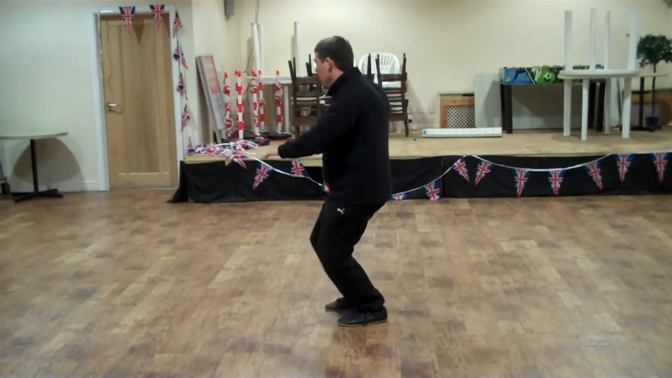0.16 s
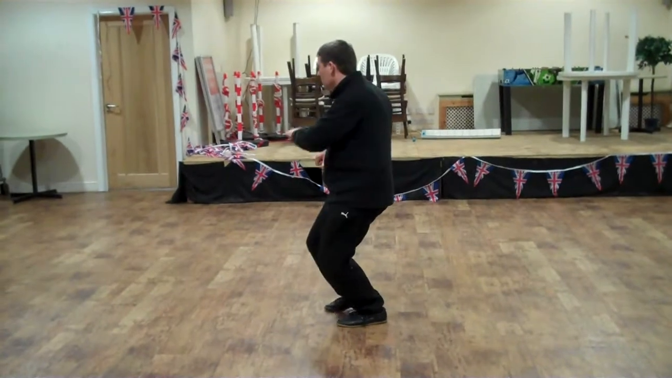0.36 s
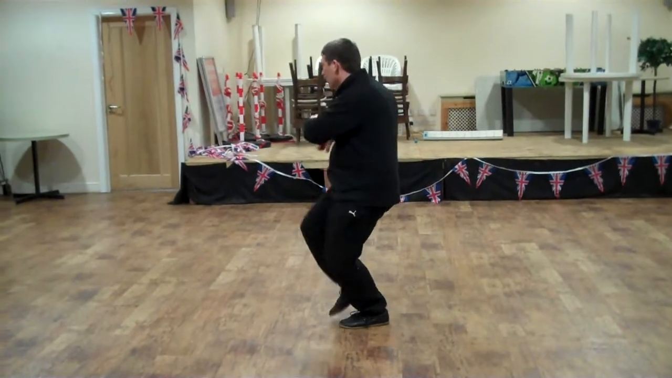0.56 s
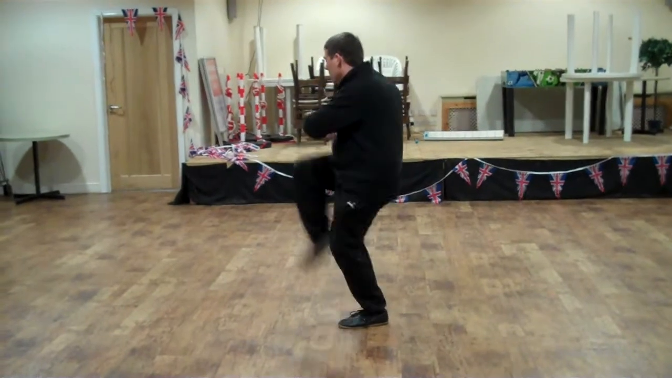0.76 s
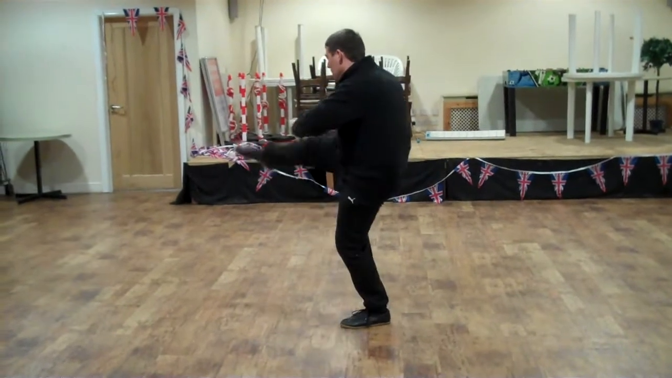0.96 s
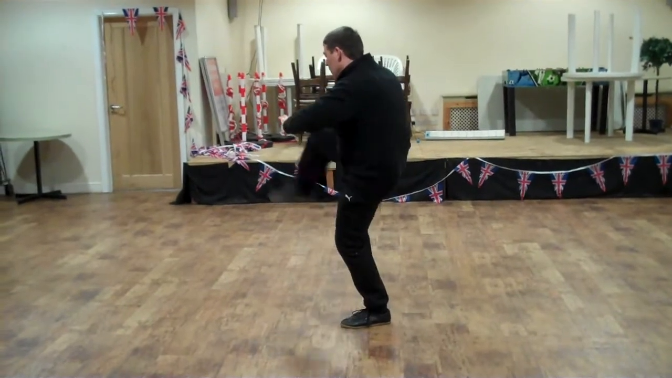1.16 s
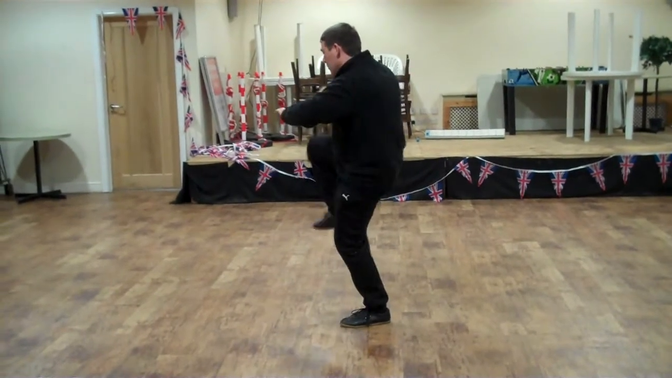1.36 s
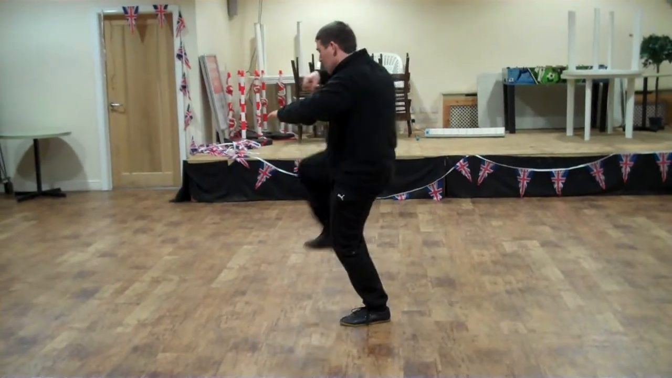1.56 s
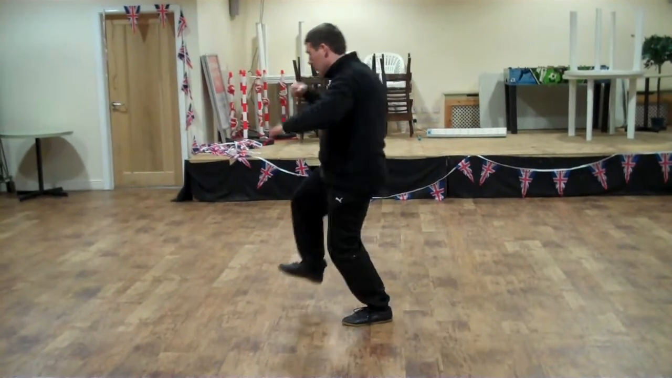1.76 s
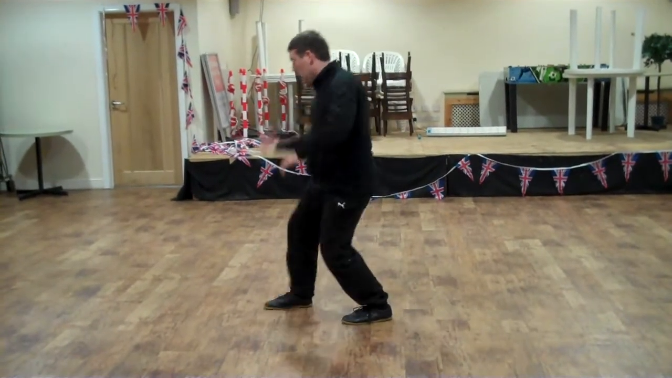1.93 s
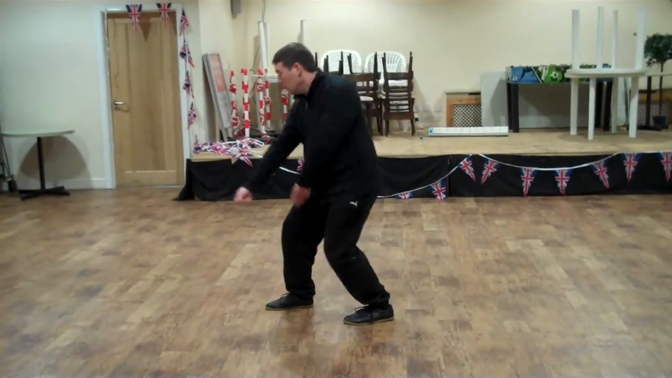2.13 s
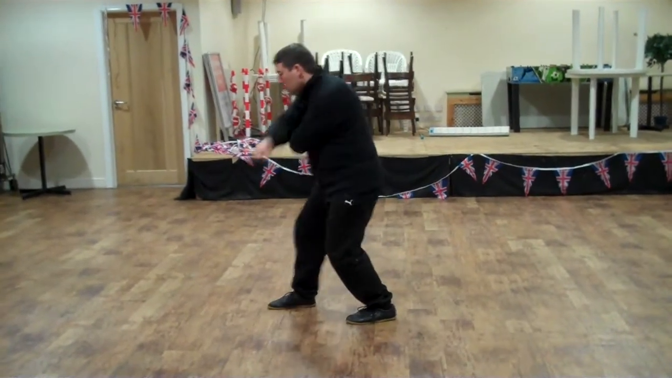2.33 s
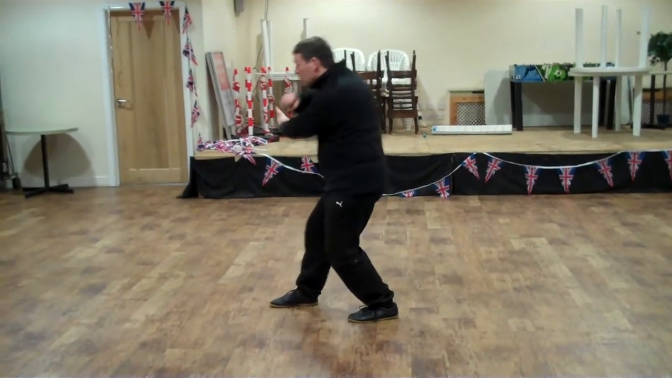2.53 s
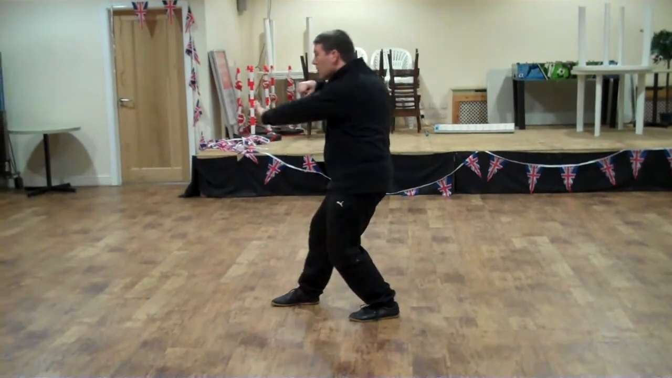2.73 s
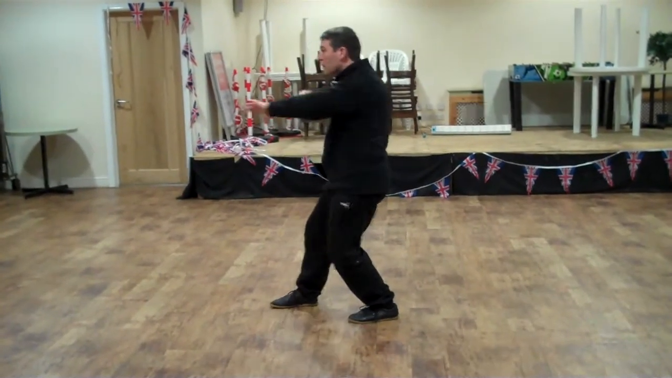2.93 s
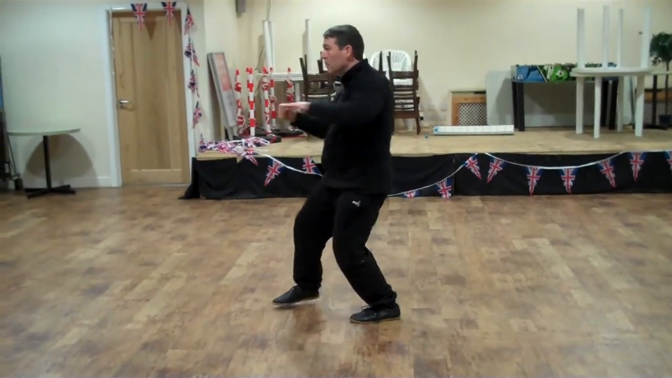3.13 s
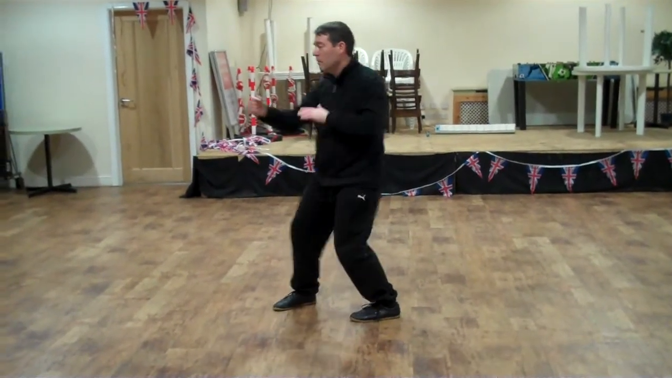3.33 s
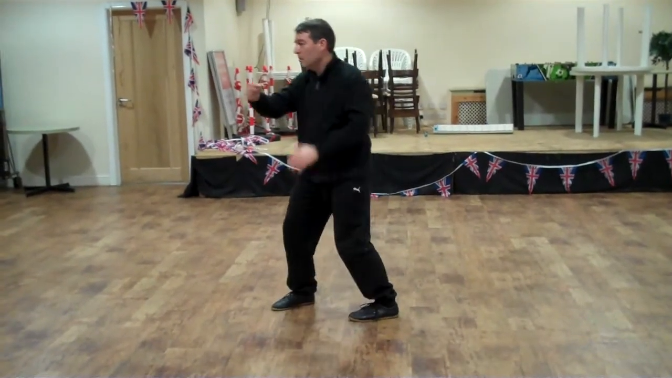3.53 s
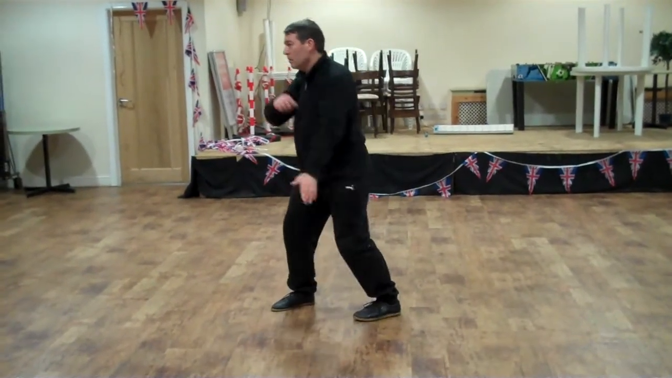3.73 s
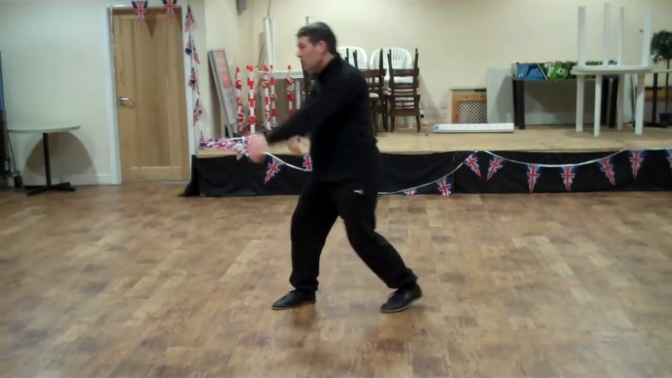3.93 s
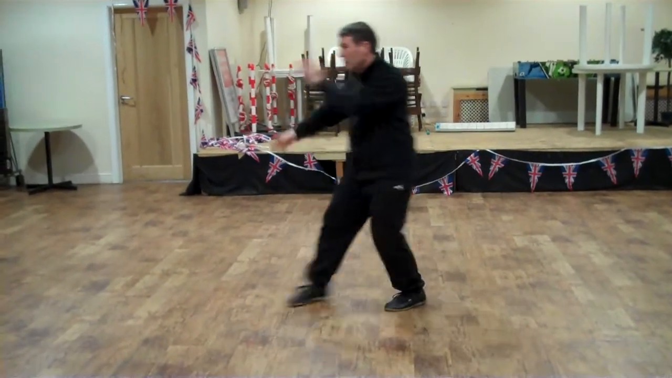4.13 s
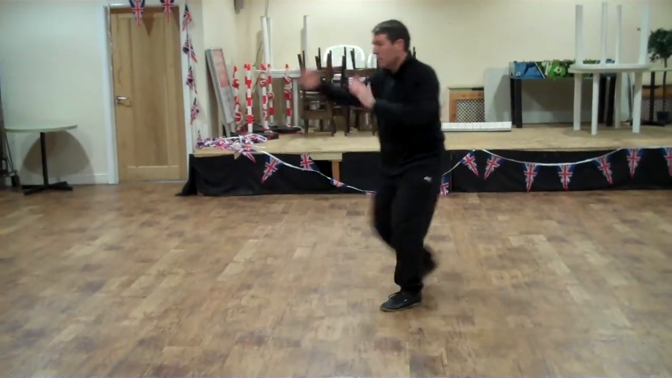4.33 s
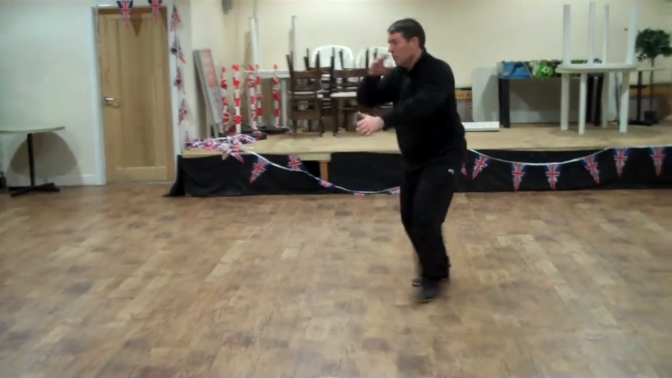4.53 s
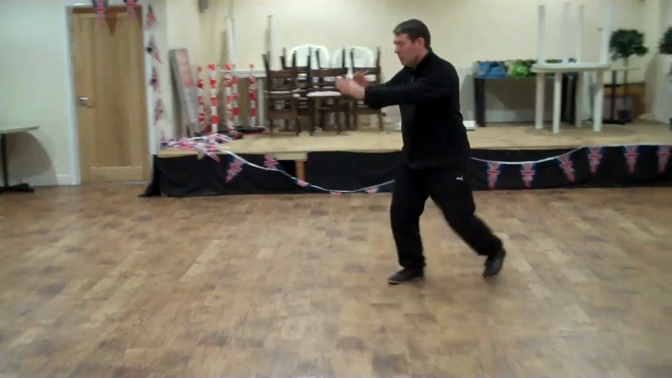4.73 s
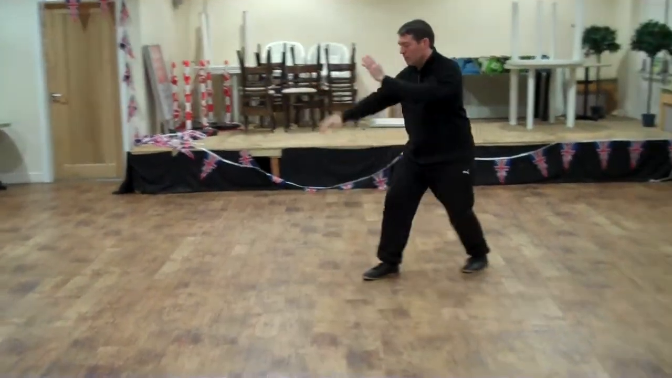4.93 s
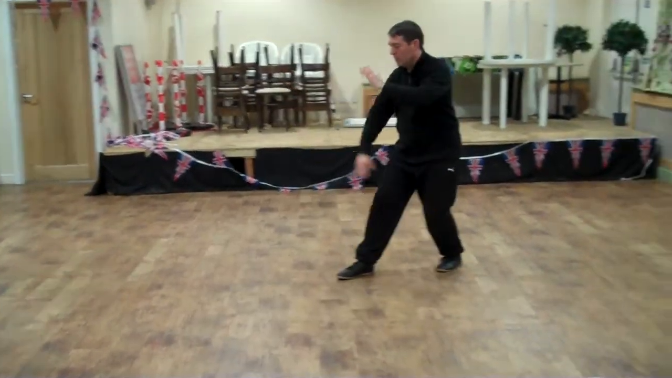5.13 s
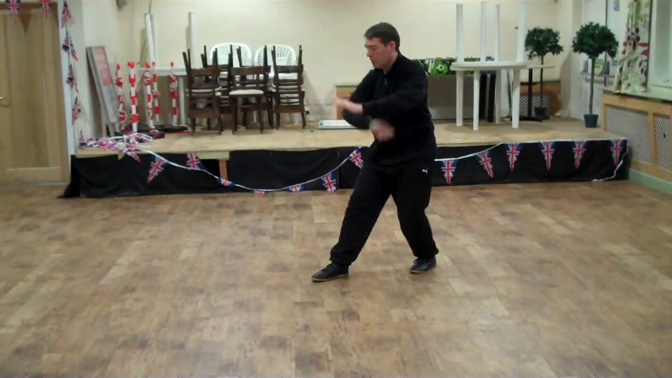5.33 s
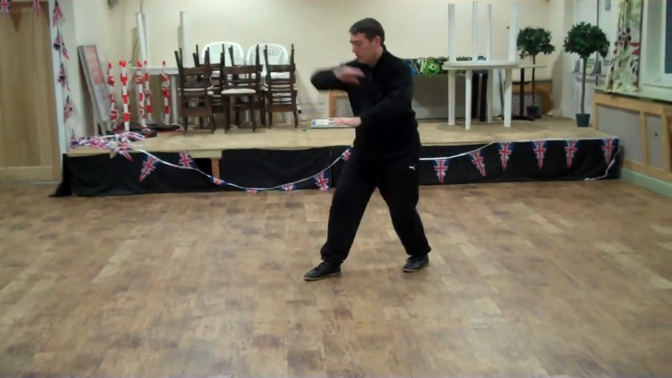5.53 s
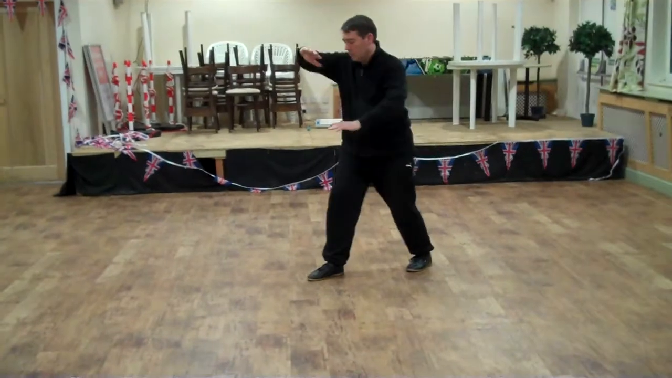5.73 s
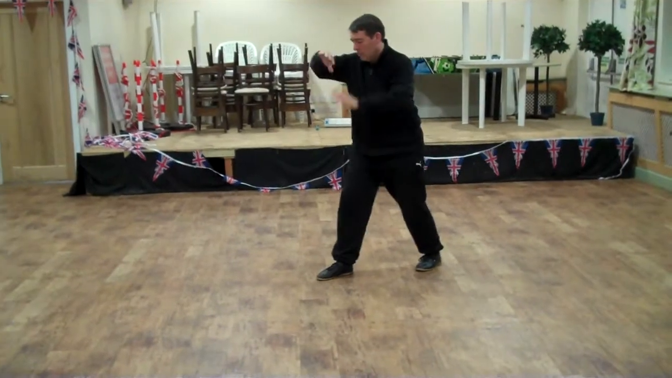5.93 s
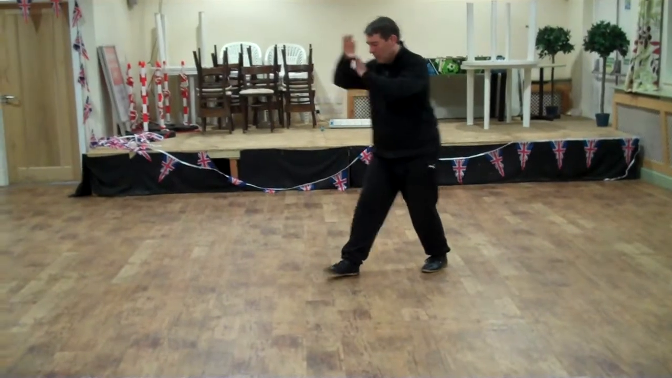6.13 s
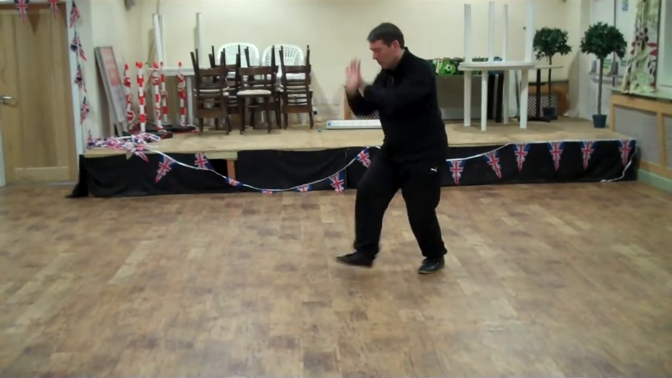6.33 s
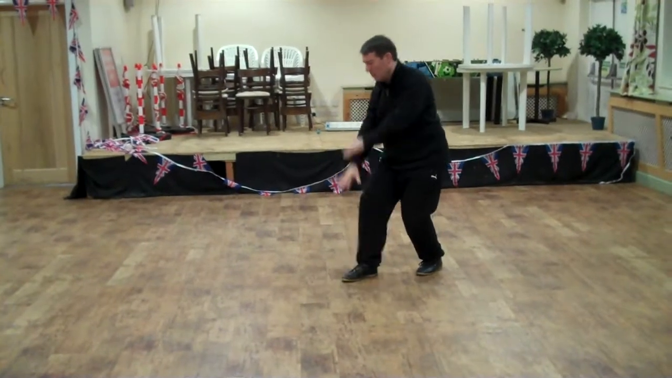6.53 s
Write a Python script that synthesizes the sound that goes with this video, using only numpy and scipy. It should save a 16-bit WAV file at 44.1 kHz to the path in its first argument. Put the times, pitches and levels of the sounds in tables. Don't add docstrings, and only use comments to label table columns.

```python
import sys
import numpy as np
from scipy import signal
from scipy.io import wavfile

SR = 44100
rng = np.random.default_rng(int(sys.argv[2]) if len(sys.argv) > 2 else 0)


def convert_level_to_amplitude(level_db):
    exponent = np.asarray(level_db, float) / 20
    return 10 ** exponent


def unload_audio(sound):
    columns = np.transpose(np.atleast_2d(sound))
    steps = np.round(np.clip(columns, -1, 1) * 32767)
    wavfile.write(sys.argv[1], SR, steps.astype(np.int16))


N = 290178


def rms_one(x):
    return x / np.sqrt(np.mean(x ** 2) + 1e-20)


def at_hz(points, hz):
    table_hz, values = np.transpose(points)
    return np.interp(np.log(hz), np.log(table_hz), values)


def gain_curve(tables):
    t = np.arange(N) / SR
    return sum(convert_level_to_amplitude(np.interp(t, *np.transpose(rows)[:2], left=-200, right=-200)) for rows in tables)


def swells(rows):
    t = np.arange(0, N + 32, 32) / SR
    power = 0
    for start, hold, db, rise, fall in rows:
        before = (start - t) / abs(rise)
        after = np.maximum(t - start - hold, 0) / abs(fall)
        power = power + convert_level_to_amplitude(db - 20 * np.maximum(before, after)) ** 2
    return np.interp(np.arange(N) / SR, t, np.sqrt(power))


def drift(rate, size):
    knots = rng.standard_normal(400)
    return np.interp(np.arange(size) / SR * rate, np.arange(400), knots)


def resonate(x, hz, width_hz):
    r = np.exp(-np.pi * width_hz / SR)
    gain = (1 - r * r) / 2
    return signal.lfilter([gain, 0, -gain], [1, -2 * r * np.cos(2 * np.pi * hz / SR), r * r], x)


def grains(per_s, spread_db):
    sizes = convert_level_to_amplitude(spread_db * np.minimum(rng.exponential(1, N), 4)) * rng.choice([-1, 1], N)
    return rms_one(sizes * (rng.random(N) < per_s / SR))


def diffuse(colour, size, shape):
    # (frequency [Hz], left-right correlation)
    likeness = [(30, .3), (60, .9), (130, .97), (290, .98), (700, .98), (1000, .9), (1400, .6), (2300, .12),
                (3090, 0), (15000, 0)]
    # (frequency [Hz], left-right difference [dB])
    left_excess = [(60, 1), (290, 1.8), (700, .5), (1290, 2.3), (2380, 5), (4390, 4.3), (8100, 6.5),
                   (15000, 6.5)]
    edges_hz = 25 * 2 ** np.arange(0, 9.4, 1 / 3)
    white = rng.standard_normal((2, 2, size + 4000))
    out = 0
    for k, (low, high) in enumerate(zip(edges_hz, edges_hz[1:])):
        if high < colour[0][0] / 2:
            continue
        band = signal.butter(2, [low, high], "band", fs=SR, output="sos")
        mid, side = signal.sosfilt(band, white[k % 2])[:, -size:]
        hz = np.sqrt(low * high)
        alike = np.clip(at_hz(likeness, hz), -1, 1)
        pair = np.sqrt(1 + alike) * mid + np.sqrt(1 - alike) * side * [[1], [-1]]
        level_db = at_hz(colour, hz) + at_hz(left_excess, hz) * np.array([[.5], [-.5]])
        out = out + convert_level_to_amplitude(level_db) * pair * shape(hz)
    return out


def hall(colour, start_s=0):
    # (frequency [Hz], time to fall 60 dB [s])
    t60 = [(60, 1.0), (170, 1.65), (340, 1.43), (650, 1.85), (1000, 1.797), (2000, 1.578), (4000, 1.222),
           (6000, 0.969), (8000, 0.649), (12000, 0.246)]
    # (frequency [Hz], time [s])
    fill = [(60, 0.0055), (200, 0.0049), (700, 0.00306), (3000, 0.00186), (9000, 0.0056)]
    t = np.arange(min(int(2.4 * SR), N - int(start_s * SR))) / SR

    def envelope(hz):
        thickening = 1 - np.exp(-t / abs(at_hz(fill, hz)))
        return thickening * convert_level_to_amplitude(-60 * t / at_hz(t60, hz))

    tail = diffuse(colour, len(t), envelope)
    return tail / np.sqrt(np.mean(tail[:, :SR // 10] ** 2))


def ventilation():
    # (frequency [Hz], level [dB per Hz])
    air_colour = [(15, -50), (28, -24.5), (45, -14), (75, -15.5), (110, -11), (190, -11), (230, -6.5),
                  (450, -5), (520, -5), (700, -6), (1000, -7.5), (1430, -15), (2500, -17), (5900, -27),
                  (7300, -27), (14500, -57)]
    # (frequency [Hz], width [Hz], level [dB])
    duct_tones = [(662.4, 23.7, -59.5), (429.2, 46, -65), (760.6, 26.3, -66.5), (139.98, 6.6, -66)]
    # (start [s], end [s], frequency [Hz], width [Hz], level [dB])
    whistles = [
        (5.15, 6.45, 2464, 11, -71.5),
        (5.698, 6.099, 1350, 38, -67),
        (5.7, 6.3, 4843, 82, -77),
    ]
    hum_hz, hum_db = 100.5, -60
    air = convert_level_to_amplitude(-51) * rms_one(diffuse(air_colour, N, lambda hz: convert_level_to_amplitude(0.346 * drift(3.206, N))))

    def tone(hz, width):
        once = resonate(rng.standard_normal(N), hz, width)
        return rms_one(resonate(once, hz, width))

    tones = sum(convert_level_to_amplitude(db) * tone(hz, width) for hz, width, db in duct_tones)
    for start, end, hz, width, db in whistles:
        passing = [(start, db - 3), (start + 0.066, db), (end - .1, db), (end, db + 0.5)]
        tones += tone(hz, width) * gain_curve([passing])
    hum = convert_level_to_amplitude(hum_db + 0.71 * drift(3.81, N)) * np.sin(2 * np.pi * hum_hz * np.arange(N) / SR)
    return air + (tones + hum) * convert_level_to_amplitude([[.6], [-.6]])


def swish():
    # (frequency [Hz], level [dB per Hz])
    hiss_colour = [(3000, -19), (4500, -9.5), (6000, -12), (7400, -2), (9000, -11), (11000, -16.5),
                   (14500, -31)]
    body_colour = [(600, -6.5), (1300, -1.5), (2500, 1), (4000, -3.5), (5500, -10), (8000, -26.5)]
    sizzle_colour = [(7000, -30), (9500, -12), (11500, -3.5), (14500, 3)]
    # (full level from [s], hold [s], level [dB], 20 dB rise [s], 20 dB fall [s])
    strokes = [(0.15, 0.16, -67.5, 1.18, 0.47), (0.458, 0.01, -62.5, 0.16, -0.05),
               (0.773, 0.028, -57.5, 0.65, 0.5), (1.0, 0.076, -64.5, 0.46, 0.67),
               (1.469, 0.3, -65.5, 0.17, 0.63), (2.929, 0.082, -65, 0.43, 0.64),
               (3.695, 0.09, -50.5, 0.1604, -0.03), (3.806, 0.0044, -46.5, 0.04, 0.01),
               (3.858, 0.082, -45, 0.0371, 0.2143), (4.128, 0.0335, -34.5, 0.0472, 0.103),
               (4.23, 0.0204, -50, 0.12, 0.24), (4.302, 0.034, -47, 0.0753, 0.1058),
               (4.373, 0.0335, -41, 0.15, 0.1817), (4.61, 0.019, -50.5, 0.07, 0.19),
               (4.737, 0.0088, -45.5, 0.07, 0.2), (4.883, 0.057, -58, 0.62, 0.56),
               (5.58, 0.03, -68, -0.52, 0.8), (5.931, 0.288, -64.5, 0.27, 0.31)]
    # (full level from [s], hold [s], level [dB], 20 dB rise [s], 20 dB fall [s])
    snaps = [
        (3.698, 0.0146, -49.5, 0.07, 0.19),
        (3.9, 0.146, -60.5, 0.19, 0.2),
        (4.155, 0.0116, -39, 0.1114, 0.1937),
        (4.26, 0.136, -47, 0.11, 0.6),
        (4.7, 0.025, -63, 0.0986, 0.166),
        (4.8, 0.166, -70.5, 0.083, 0.481),
    ]
    # (time [s], level [dB])
    creaks = [
        (0.4605, -49),
        (1.274, -41.5),
        (3.6644, -49.5),
        (3.79, -50),
        (4.6109, -43.5),
        (5.5994, -59.5),
    ]
    hiss = rms_one(diffuse(hiss_colour, N, lambda hz: 1))
    body = rms_one(diffuse(body_colour, N, lambda hz: 1))

    sizzle_db, from_db, slope, fade = -11.5, -40, 0.67, 0.4
    firm = [(s, hold, db + sizzle_db + (slope - 1) * (db - from_db), rise, fade * fall)
            for s, hold, db, rise, fall in strokes if db > -57]
    sizzle = rms_one(diffuse(sizzle_colour, N, lambda hz: 1)) * swells(firm)

    ticks = np.zeros(N)
    ticks[[round(s * SR) for s, db in creaks]] = convert_level_to_amplitude(np.array(creaks)[:, 1] - 7.5)
    puffs = signal.lfilter([1], [1, -np.exp(-1 / (0.0048 * SR))], ticks)
    bright = swells(strokes) * convert_level_to_amplitude(2.0 + 1.1 * drift(40, N))
    return sizzle + hiss * (bright + convert_level_to_amplitude(-5.0) * puffs) + body * (swells(snaps) + puffs)


def soles():
    # (time [s], level [dB], rub centre [Hz], width [octaves])
    slides = [
        [(4.26, -40, 476, 0.16), (4.275, -34, 452, 0.13), (4.29, -44, 750, 0.25), (4.32, -31.5, 967, 0.232),
         (4.4, -36, 892, 0.4), (4.49, -41, 970, 0.15), (4.63, -43, 980, 0.12), (4.66, -51.5, 980, .2)],
        [(4.68, -51.5, 1390, 0.106), (4.69, -34.5, 1370, 0.092), (4.73, -31.5, 939, 0.208),
         (4.77, -37, 879, 0.254), (4.86, -41, 799, 0.56), (4.98, -48.5, 1200, 0.245), (5.1, -67, 910, 0.29)],
    ]
    # (full level from [s], hold [s], level [dB], 20 dB rise [s], 20 dB fall [s])
    shifts = [
        (1.18, 0.056, -51.5, 0.03117, 0.69),
        (3.6, 0.0038, -43, 0.0097, 0.035),
        (3.99, 0.0049, -51.5, 0.041, 0.07),
    ]
    # (full level from [s], hold [s], level [dB], 20 dB rise [s], 20 dB fall [s])
    flexes = [
        (4.14, 0.02, -72, 0.2043, 0.21),
        (4.44, 0.1, -64, 0.65, 1.042),
        (5.03, 0.05, -70.5, 0.62, 0.3),
    ]
    slips = grains(per_s=5000, spread_db=3.0)
    s, _, centre_hz, octaves = np.transpose(slides[0] + slides[1])
    t = np.arange(N) / SR
    centre = np.interp(t, s, centre_hz)
    wide = np.interp(t, s, octaves)
    rub = np.zeros(N)
    for hz in np.geomspace(420, 2000, num=20):
        opening = convert_level_to_amplitude(-40.5) + np.exp(-(np.log2(centre / hz) / wide) ** 2)
        rub += resonate(slips, hz, 0.0427 * hz) * opening * np.sqrt(.3 / wide)
    shuffle = resonate(grains(per_s=2500, spread_db=5.5), 1120, 970)
    flex = resonate(rng.standard_normal(N), 52, 35)
    return rms_one(rub) * gain_curve(slides) + rms_one(shuffle) * swells(shifts) + rms_one(flex) * swells(flexes)


def slaps():
    arrival_s = [1.8954, 1.8997, 1.9016, 1.9062, 1.9082, 1.9127, 1.9195, 1.9525, 3.2582, 3.2612, 3.2628,
                 3.2660, 3.2696, 3.2728, 6.4744, 6.4764, 6.4780, 6.4788, 6.4824, 6.4853, 6.4878, 6.4890,
                 6.4910, 6.5046]
    # (crack [dB], snap [dB], clap [dB], clap frequency [Hz])
    arrivals = [
        [(-11, -12, -18.5, 3460), (-12, -23, -10, 2420), (-29, -5, -3.5, 1895), (-10.5, -31, -9, 2680),
         (-7, -9.5, -11, 2060), (-6, -14, -20.5, 2440), (-7.5, -24, -29.5, 2357), (-15.5, -16, -26.5, 2960)],
        [(-8.5, -13.5, -12.5, 2760), (-19, -11, -10, 1930), (-18, -14, -15, 2380), (-18, -23.5, -20.5, 2250),
         (-23, -28, -17, 2250), (-24.5, -27, -21, 2470)],
        [(-3, -10.5, -7, 2650), (-11.5, -25.5, -9, 2570), (-33, -12.5, -3, 3090), (-5.5, -22.5, -5, 1674),
         (-18.5, -26.5, -6, 1770), (-10, -25, -10.5, 1950), (-16.5, -29.5, -9.5, 2480),
         (-21.5, -19.5, -11, 2050), (-22, -27.5, -10, 1600), (-29, -27.5, -13.5, 1640)],
    ]
    # (board level [dB], loss per echo [dB], left-right difference [dB])
    boards = [
        (-15.5, 0.12, 8),
        (-24.5, 1.04, 8.5),
        (-18.5, 1.74, 9),
    ]
    # (time [s], level [dB])
    tails = [
        (1.896, -22),
        (3.259, -32),
        (6.475, -25),
    ]
    # (frequency [Hz], level [dB per Hz])
    tail_colours = [
        [(29, -62), (50, -20.5), (97, -19), (251, -14), (342, -3), (443, -20), (680, 2.5), (765, -13),
         (841, -4.5), (1380, -13.5), (1760, -9.5), (3030, -15), (3330, -13.5), (7460, -15.5), (14500, -71)],
        [(29, -65), (50, -36), (97, -10), (198, -26.5), (228, -12), (342, -6.5), (536, -20), (696, -1.5),
         (1230, -3), (1380, -1), (1560, -21.5), (1930, 0.5), (3180, -10), (7290, -11), (14500, -68.5)],
        [(29, -57), (50, -20), (168, -22.5), (223, -6), (403, -5.5), (488, -16.5), (604, -0.5), (680, -9.5),
         (1090, -12), (1630, -9), (1800, -9), (3100, -11.5), (5350, -21), (7830, -13.5), (14500, -52)],
    ]
    # (frequency [Hz], width [Hz], level [dB])
    tail_peaks = [
        [(325, 62, -2), (626, 183, 2.5), (1559, 140, 2), (2031, 21, -10), (2707, 100, 4.5),
         (3220, 22.17, -18.5), (3518, 110, 1), (3910, 33, -13.5), (4630, 37, -25.5), (5430, 51, -6)],
        [(328, 170, -13.5), (682, 114, -15), (1400, 59, -0.5), (1940, 132, -2.5), (2678, 113, -14.5),
         (3705, 92, -13.5), (4132, 160, -1), (4430, 57, -10), (4930, 62.6, -19.5), (5380, 28.55, -20)],
        [(618, 89, 0.5), (1440, 57, -6.5), (1598, 80.7, 19.5), (1933, 70, -14), (2600, 80, -7), (3123, 42, -4),
         (3400, 31, -13), (4120, 104.4, -16.5)],
    ]
    out = np.zeros((2, N + 3 * SR))
    t = np.arange(SR // 50) / SR
    times = iter(arrival_s)

    def packet(db, hz, rise_s):
        swell = t / rise_s * np.exp(1 - t / rise_s)
        return convert_level_to_amplitude(db) * swell * np.sin(-2 * np.pi * hz * t)

    for slap, (board_db, loss_db, pan_db) in zip(arrivals, boards):
        for k, (crack_db, snap_db, clap_db, clap_hz) in enumerate(slap):
            bright = packet(crack_db, 6575, 0.000147) + packet(snap_db, 4327, 0.000248)
            bright += packet(clap_db, clap_hz, 0.000321)
            board = packet(board_db - k * loss_db, 874, 0.00058)
            i = round(next(times) * SR)
            out[:, i:i + len(t)] += bright * convert_level_to_amplitude([[0], [-pan_db]]) + board
    out = signal.sosfilt(signal.butter(2, 300, "high", fs=SR, output="sos"), out)

    for (s, tail_db), colour, peaks in zip(tails, tail_colours, tail_peaks):
        tail = hall(colour, s)
        ringing = sum(convert_level_to_amplitude(0.235 * db - 2.0) * resonate(tail, hz, 1.405 * width) for hz, width, db in peaks)
        tail = convert_level_to_amplitude(-2.0) * tail + ringing
        i = round(s * SR)
        out[:, i:i + tail.shape[1]] += convert_level_to_amplitude(tail_db) * tail
    return out[:, :N]


def scene():
    rubs, cloth = soles(), swish()
    answer = hall([(50, 0), (15000, 0)])
    answer = answer / np.sqrt(np.sum(answer ** 2) / 2)
    send = convert_level_to_amplitude(-11.5) * rubs + convert_level_to_amplitude(-10) * cloth.mean(axis=0)
    wet = signal.fftconvolve(answer, send[None], axes=1)[:, :N]
    direct = convert_level_to_amplitude(-6.5) * rubs * convert_level_to_amplitude([[1.1], [-1.1]]) + convert_level_to_amplitude(0.5) * cloth
    return ventilation() + slaps() + direct + wet


def band_limit(x):
    return signal.sosfilt(signal.butter(12, 15550, fs=SR, output="sos"), x)


def record(dry):
    port = dry + convert_level_to_amplitude(-3) * resonate(dry, 7395, 820)
    port = signal.sosfilt(signal.butter(2, 10500, fs=SR, output="sos"), port)
    hiss = convert_level_to_amplitude(-61) * rng.standard_normal(dry.shape) * convert_level_to_amplitude([[2.6], [-2.6]])
    rounded = np.tanh(port + hiss)
    mix = signal.sosfilt(signal.ellip(8, 1, 24, 14350, fs=SR, output="sos"), rounded)
    return band_limit(mix)


dry = scene()
out = record(dry)
unload_audio(out)
```